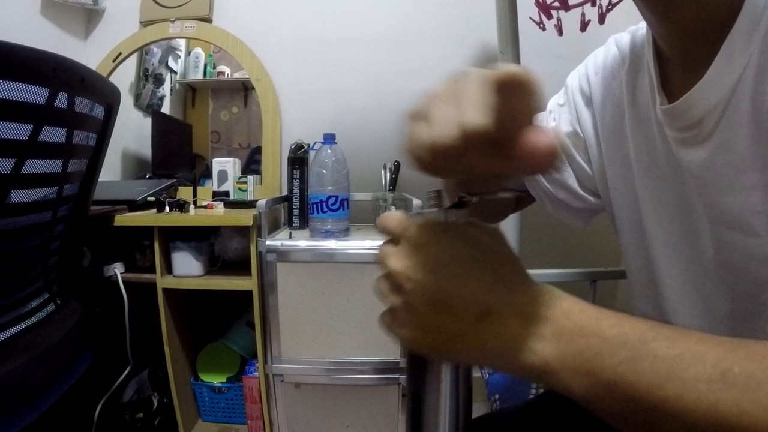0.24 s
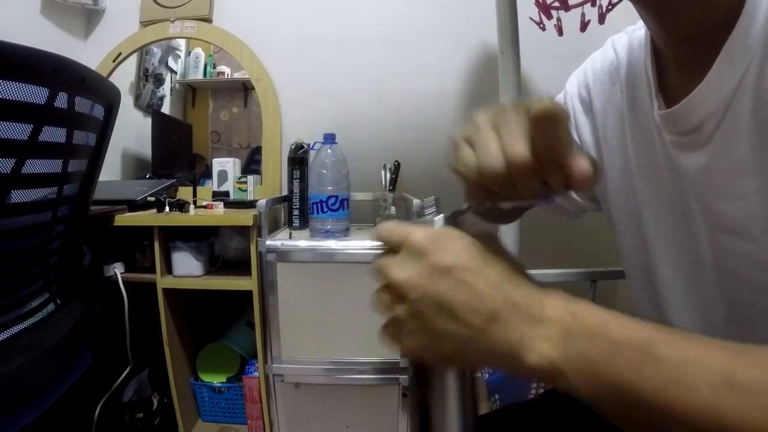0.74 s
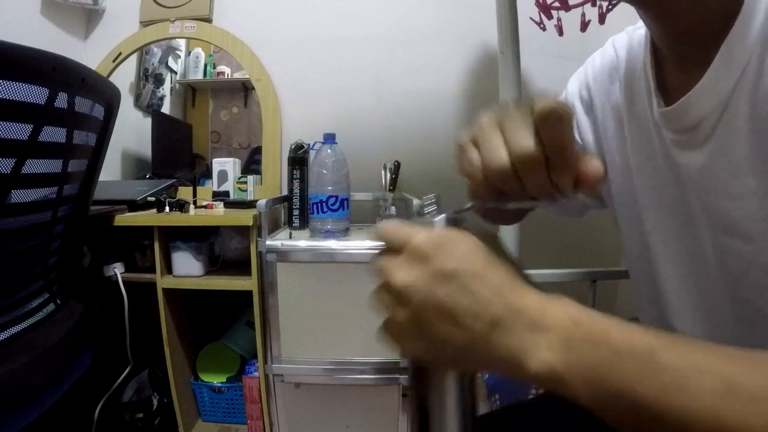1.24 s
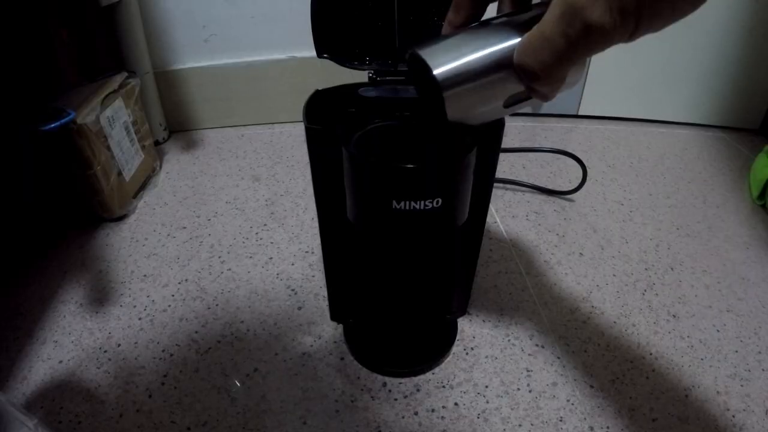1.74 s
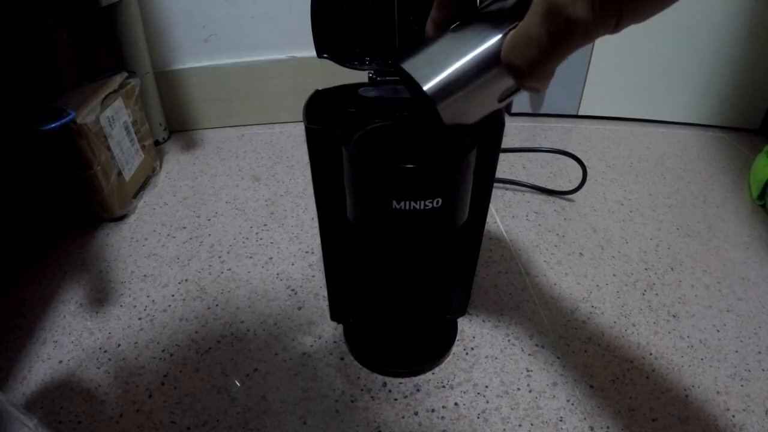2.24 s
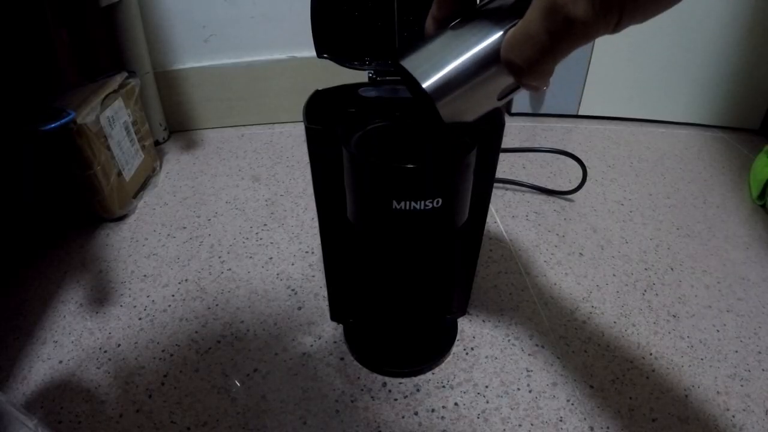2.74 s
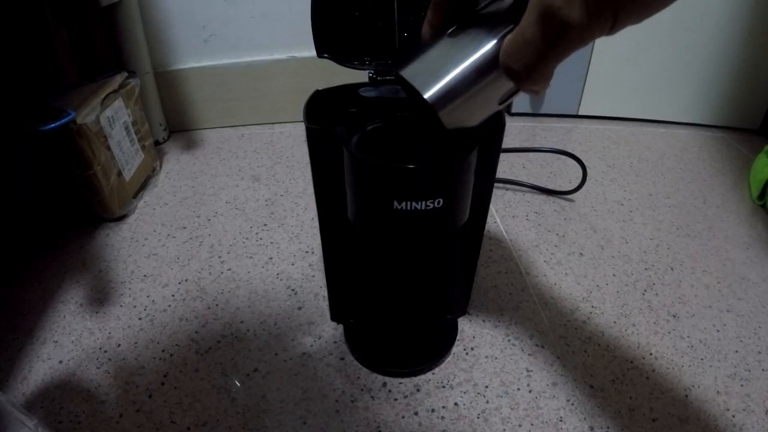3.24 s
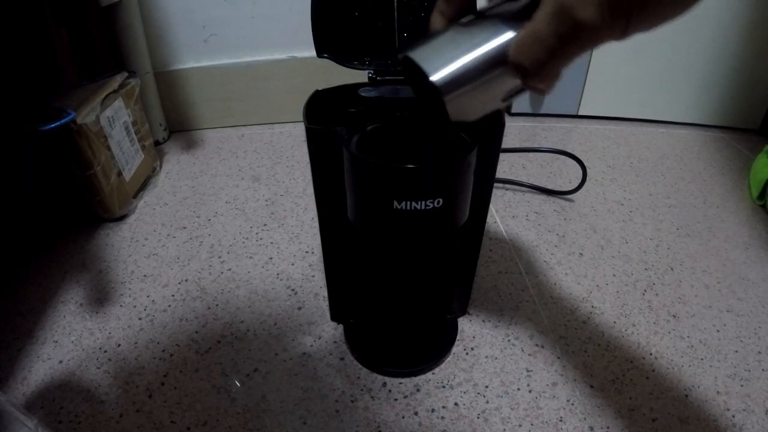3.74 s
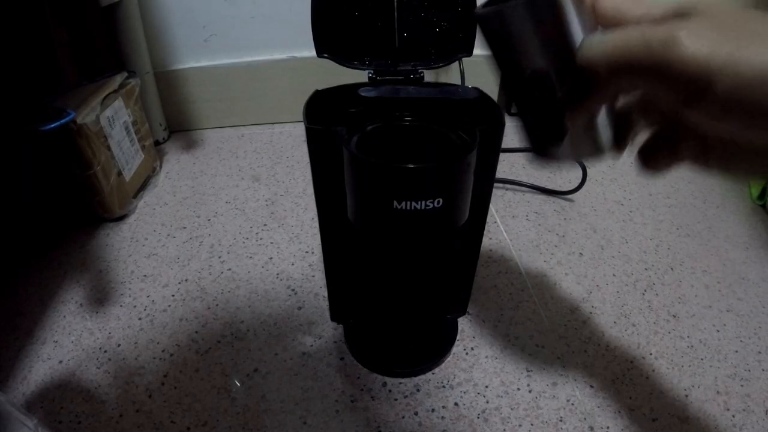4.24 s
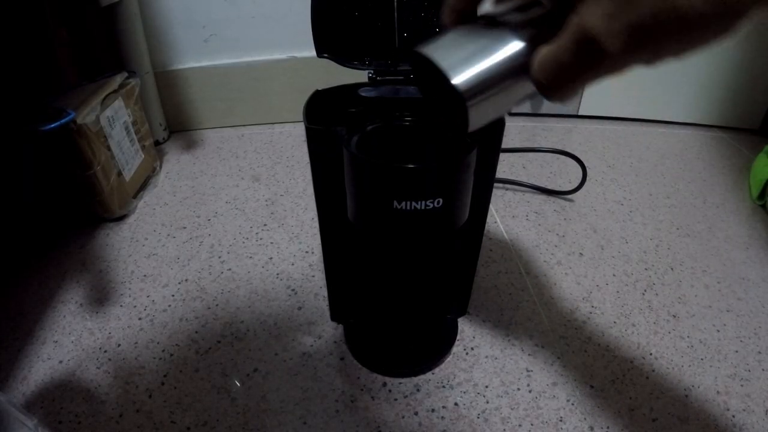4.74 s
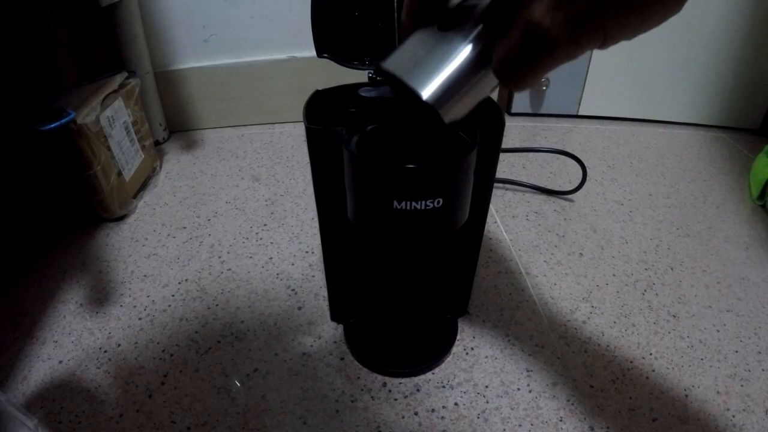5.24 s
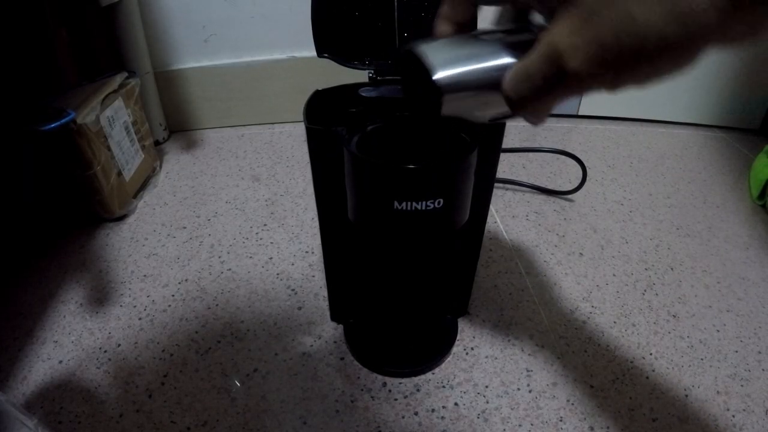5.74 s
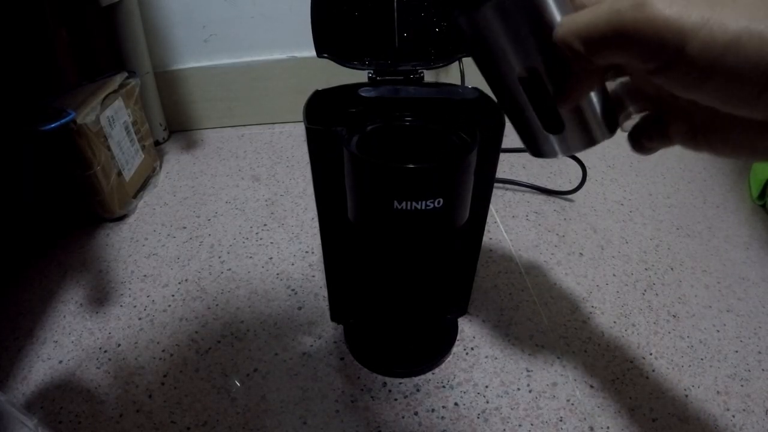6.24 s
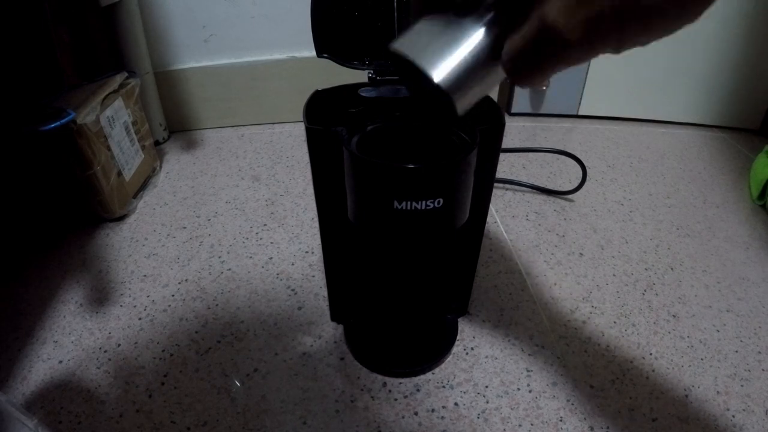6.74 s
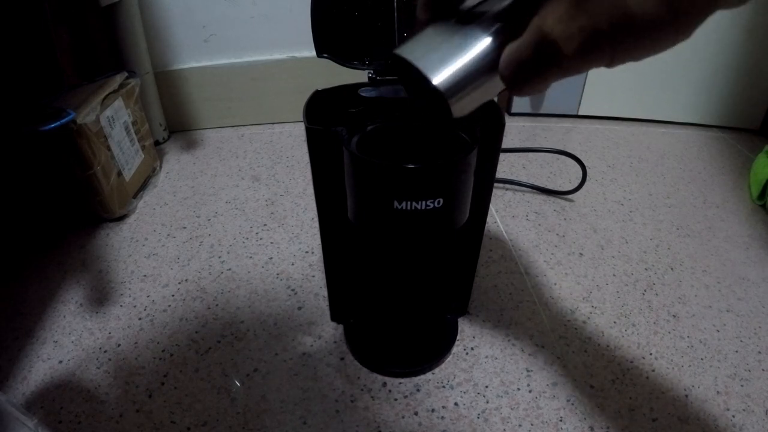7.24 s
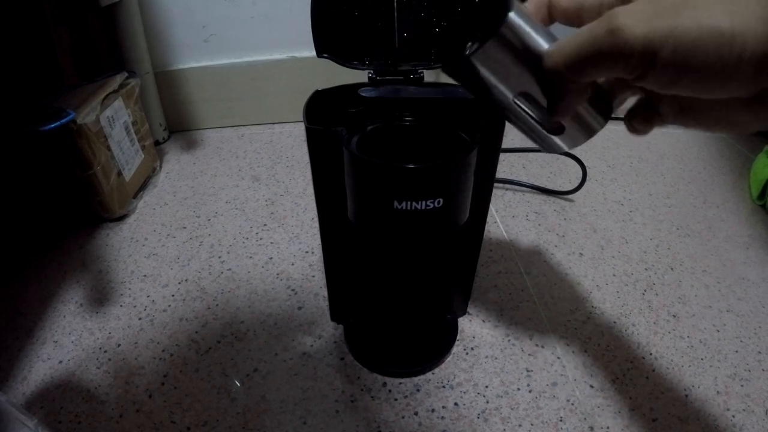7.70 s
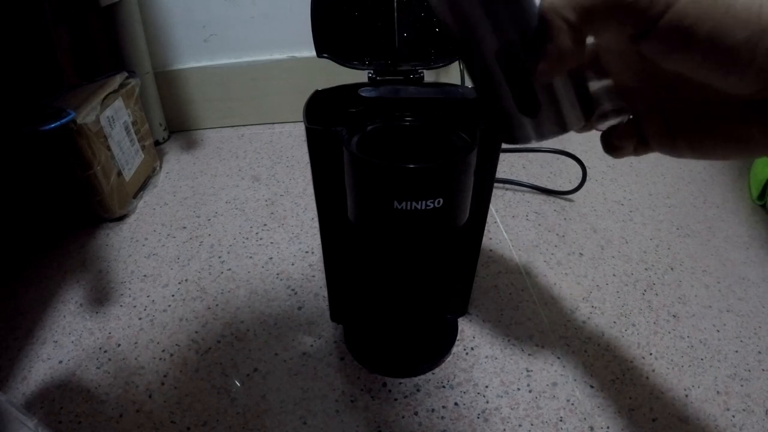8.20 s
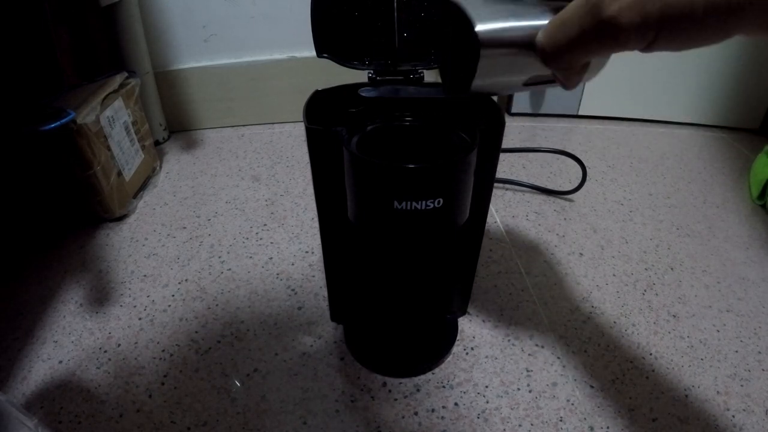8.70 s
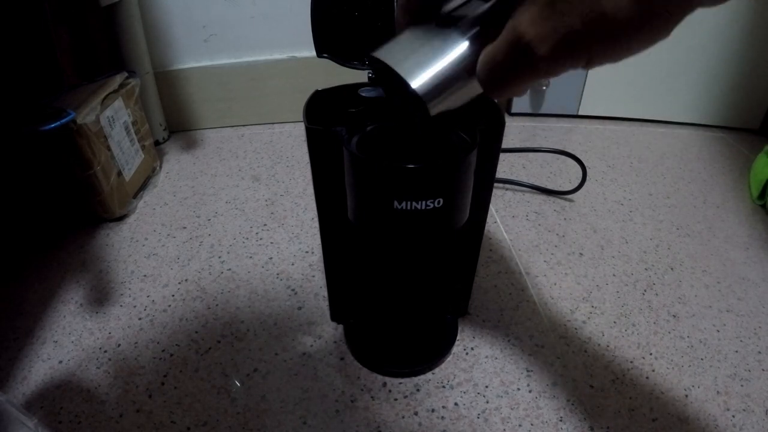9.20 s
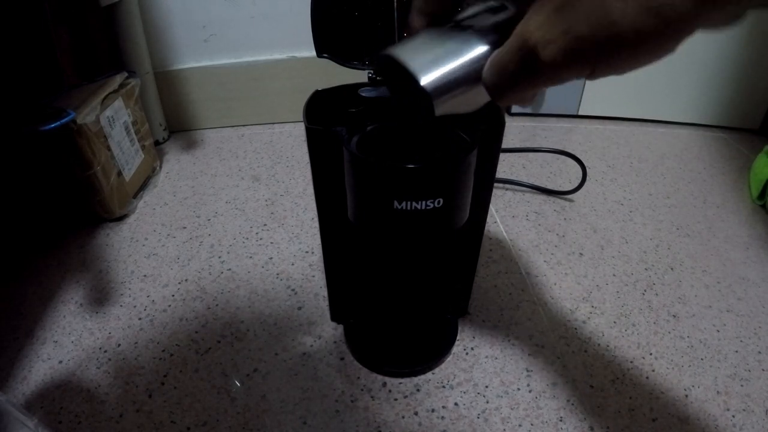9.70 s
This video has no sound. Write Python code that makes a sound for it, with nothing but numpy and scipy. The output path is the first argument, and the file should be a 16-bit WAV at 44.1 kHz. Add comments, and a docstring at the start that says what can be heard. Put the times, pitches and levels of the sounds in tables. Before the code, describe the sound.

Close up in a small room, a hand-cranked steel grinder crunches coffee beans with gritty scraping, sharp cracks and thin metallic ticks. After about a second and a half it cuts hard to a quieter moment: a steel cup taps a plastic coffee machine several times with short, hollow knocks, then shifts with barely audible chinks and soft thuds. Faint hum, low rumble, hiss and regular tiny electrical ticks run underneath.

```python
"""Coffee grinder, then a tapped steel cup

A hand-cranked steel grinder crunches beans: noise splinters and short rings drive burr and barrel filters. The
sound then cuts to a later moment: the steel cup taps a plastic machine, as decaying modes and noise, and chinks
as it shifts in the hand; these chinks and soft thuds through the floor are swells of narrow noise. Low tones
and coloured noise make the faint hum, rumble and hiss; a camera's wireless beacon ticks in the microphone
circuit as damped rings."""
import sys
import numpy as np
from scipy import signal
from scipy.fft import rfft, irfft, next_fast_len
from scipy.io import wavfile
from scipy.ndimage import map_coordinates

SR = 44100
rng = np.random.default_rng(int(sys.argv[2]) if len(sys.argv) > 2 else 0)


def digitize_waveform(pressure):
    """Quantize a signal to 16-bit integers and store it at the path in sys.argv[1].

    Rows of a 2-D input are taken as channels; values are limited to [-1, 1].
    """
    field = np.atleast_2d(pressure).T
    bounded = np.clip(field, -1, 1)
    quanta = np.round(bounded * 32767).astype(np.int16)
    wavfile.write(sys.argv[1], SR, quanta)


N = 439223

# Crank effort: (time [s], crunch level [dB], low grind relative to the crunch [dB])
CRANK = [(0, -61.5, -17), (.13, -58.5, -8), (.18, -53.5, -8), (.25, -51, -6.5), (.47, -52, -4.5),
         (.575, -47, -3), (.65, -52.5, -6), (.77, -49, -1.5), (1.0, -51, -2), (1.26, -50.5, -10),
         (1.42, -51.5, -4.5), (1.482, -60, -8), (1.53, -49, -7)]
# Cracking beans and crank knocks: (time [s], strength [dB], ring pitch [Hz], low part relative to it [dB])
CRACKS = [(0.0474, -40, 3100, -14), (0.0867, -25.5, 2540, -21), (0.1184, -41, 1540, -12),
          (0.149, -35, 2980, -25), (0.177, -32, 3100, -25), (0.2443, -32, 3030, -7.5),
          (0.2857, -32, 3090, -23), (0.456, -31, 1470, -28), (0.4855, -25.5, 3000, -20),
          (0.5164, -27, 1550, -8), (0.5937, -25, 3080, -18), (0.6776, -32.5, 1650, -25),
          (0.7265, -33, 1710, -14), (0.9133, -30, 1570, -19), (0.9995, -35, 1530, -19),
          (1.0753, -28, 2890, -11), (1.128, -40, 1600, -26), (1.141, -29, 3070, -23),
          (1.1904, -29, 1530, -15), (1.2321, -39, 1600, -23), (1.293, -26.5, 2700, -16),
          (1.35, -28, 3140, -17), (1.3857, -26, 1320, -19), (1.3963, -25, 1710, -11),
          (1.4441, -28, 2290, -24), (1.4705, -32, 1550, -11), (1.4976, -20.5, 1640, -15),
          (1.512, -12.5, 1550, -21)]
# Thin ticks of steel on steel: (time [s], strength [dB], pitch [Hz])
TICKS = [(0.1481, -58, 7030), (0.388, -50, 7730), (0.4898, -52, 7510), (0.5172, -49, 7240),
         (0.552, -45, 7240), (0.5935, -49, 14700), (0.8674, -50, 10300), (0.97, -49, 8470),
         (1.0005, -42, 7090), (1.1278, -56, 7830), (1.1422, -43.5, 10700), (1.497, -45, 13700)]
# Colour of the crunch: (frequency [Hz], density [dB per Hz])
BURRS = [(530, -19.5), (900, -4.5), (1670, 4), (2270, -3), (3020, -1), (3320, -7), (4010, -4), (7000, -36),
         (9100, -78), (15400, -120)]
# Colour of the low grind: (frequency [Hz], density [dB per Hz])
GRIND = [(150, -38.5), (250, -12), (280, -15), (618, -1.5), (1200, -2.5), (1560, -44), (2640, -120)]
# Colour of the bright scrape: (frequency [Hz], density [dB per Hz])
SCRAPE = [(3240, -16), (5500, -0.5), (8870, -9.5), (12900, -14.5), (14700, -9), (15600, -14), (16000, -33)]
# Resonances of the steel barrel: (frequency [Hz], width [Hz], lift [dB])
BARREL = [(1650, 220, -0.5), (2560, 50, 4), (3120, 71, 9), (4150, 120, 0.5), (4830, 75, 7),
          (5950, 220, 6.5)]
# Cup against the machine: (time [s], strength [dB], thump relative to it [dB], dull knock relative to it [dB],
# flight to the bounce [s], loss in the bounce [dB])
TAPS = [(2.081, -40, -10, -10, .037, 30), (2.242, -53, -14, -14, .03, 30),
        (2.2638, -32.5, -13, -19.5, .037, 21), (2.4899, -24, -20.5, -22, 0.028, 22),
        (2.9514, -20, -21.5, -23.5, 0.033, 18), (3.174, -23, -16, -16.5, .0349, 16.5),
        (5.6738, -28.5, -12, -12, 0.018, 18), (5.7144, -33, -12.5, -14, .0366, 7.5)]
# Modes of the plastic housing: (frequency [Hz], relative level [dB], t60 [s])
SHELL = [(1145, 3, 0.07), (1330, 7, 0.023), (1505, 5, 0.04), (1735, -22, 0.045), (2280, -20, 0.028),
         (2520, -5.5, 0.026), (2855, -6, 0.032), (3510, -7, 0.027), (4170, -15, 0.021)]
# Modes of its side panel: (frequency [Hz], relative level [dB], t60 [s])
PANEL = [(508, 6.5, 0.043), (590, 7.5, 0.052), (779, 9.5, 0.036), (854, 0.5, 0.036)]
# Modes of its low cavity: (frequency [Hz], relative level [dB], t60 [s])
HOLLOW = [(163, -1.5, 0.11), (259, 6.5, 0.048), (374.5, 3.5, .05)]
# Colour of its many weak modes: (frequency [Hz], density [dB per Hz])
CLACK = [(300, -41), (700, -9.5), (1300, 2.5), (1900, -8), (2600, -5), (5000, -52.5)]
# Colour of the first contact: (frequency [Hz], density [dB per Hz])
SNAP = [(1060, -24), (1800, -23.5), (3010, -5), (5810, -21), (6460, -26.5), (9050, -29.5), (15000, -46)]
# Faint chinks of the cup as it turns: (time [s], strength [dB], pitch [Hz])
CHINKS = [(3.553, -68, 3800), (3.887, -60, 2500), (3.899, -55.5, 2950), (3.924, -52, 2840),
          (3.949, -62, 2650), (4.18, -69, 2810), (4.594, -66, 2680), (5.77, -64, 2750), (5.901, -69, 2700),
          (5.998, -61.5, 2820), (6.31, -72, 2830), (6.334, -65, 2640), (6.423, -58, 2700),
          (6.448, -62.5, 3050), (6.487, -65, 2750), (7.41, -71, 2740), (7.5, -71, 2790), (8.387, -70, 2680),
          (8.53, -68, 2900), (9.82, -67, 2820)]
# Soft thuds and a rustle through the floor:
# (time [s], strength [dB], pitch [Hz], length [s], width [share of pitch])
THUDS = [(8.69, -48, 68, 0.084, 0.22), (8.705, -50.5, 146, 0.055, .25), (9.11, -45.5, 66, 0.11, 0.31),
         (11, -50, 163, 0.08, 0.2), (9.1, -66.5, 1100, .07, 1)]
# Slow air: (time [s], level [dB])
SWAY = [(0.0, -74), (0.08, -54), (3.05, -62.5), (5.52, -50), (6.55, -62.5), (8.07, -46), (8.71, -55),
        (9.04, -40), (9.96, -56)]
# Steady tones: (frequency [Hz], level before the cut [dB], level after it [dB], depth of waver [dB])
HUM = [(100.15, -60.5, -58, 1.1), (73.2, -76, -65, 2.5), (18.2, -57, -62, 1.5), (27.3, -65.5, -68.5, -8),
       (61.3, -80, -71, 7), (49.5, -68, -67.5, 4)]
# Colour of the rumble: (frequency [Hz], density [dB per Hz])
RUMBLE = [(8.2, -42), (14, -4), (53, -3.8), (104, -5), (147, -14), (270, -15.5), (420, -25), (550, -67),
          (920, -120)]
# Mean rumble level: (before the cut [dB], after it [dB])
RUMBLE_DB = (-64.5, -62)
# Colour of the hiss: (frequency [Hz], density [dB per Hz])
HISS = [(250, -7), (450, 3.5), (590, 4), (655, 11), (730, 3.5), (900, 1), (1200, -1), (2100, -2.5),
        (5000, -7.5), (10000, -10.5), (15000, -11.5), (15400, -30)]
# Mean beacon strength: (before the cut [dB], after it [dB])
BEACON_DB = (-50, -47)
# Dying away of the room: (frequency [Hz], t60 [s])
ROOM = [(200, 0.2), (1500, 0.14), (5000, 0.15), (12000, 0.16)]

CUT_S = 1.526  # the grinder stops here and the later moment starts
TOP_HZ = 16400  # nothing is kept from here up

# Grinder
SPLIT_HZ = 2300  # between lower and upper crunch
UPPER_DB, BRIGHT_DB = 2, -19  # upper crunch, and scrape at full effort, over the crunch
FULL_DB, EASES = -50, 0.55  # crunch at full effort; share of a drop in effort that the scrape ignores
TURN_S, PUSH_S, PUSH_DB = 0.505, 0.43, 2  # one turn of the crank, moment of a push, brightening it gives
CRACK_BLOW_T60_S, CRACK_RING_T60_S = 0.0206, 0.02
UPPER_LAGS = 0.3  # upper part of a crack falls behind in harder cracks [dB per dB]
CRACK_BRIGHT_DB = -32.5  # scrape that a crack sets off, over its strength

# Beacon
BEACON_S, BURST_S = .1024, .00212  # period, time on air
FIRST_S = (.0925, 1.58366)  # first burst before and after the cut
STRAY_S = 2.8465  # one more burst, out of step

# Cup
SNAP_DB, SNAP_FADES = -14.5, .8  # first contact over the blow; share of a bounce's loss it loses on top
DAMPED_S = (.1, 0.043)  # t60 of the hand's damping (blow, bounce)
THUMP_KEEPS, KNOCK_KEEPS = 0.17, 1  # share of a bounce's loss that cavity and panel escape
KNOCK_TOP_DB = -3  # loudest knock over a contact
CHINK_S, CHINK_WIDTH = 0.011, 0.16  # length; width as share of pitch

T = np.arange(N) / SR
AFTER = T >= CUT_S


def amp(db):
    """Gain of a level in dB."""
    return 10 ** (np.asarray(db) / 20)


def unit(x):
    """x at rms 1."""
    return x / np.sqrt(np.mean(x ** 2) + 1e-20)


def along(points, hz):
    """Reads (Hz, value) points on a log frequency axis."""
    f, v = np.transpose(points)
    return np.interp(np.log(hz + 1), np.log(f + 1), v)


def curves(rows):
    """One value per sample for each column after the time."""
    s, *cols = np.transpose(rows)
    return [np.interp(T, s, c) for c in cols]


def wobble(rate):
    """A smooth random curve with rate knots a second."""
    knots = rng.standard_normal(int(N * rate / SR) + 4)
    return map_coordinates(knots, [T * rate])


def coloured(x, db_of):
    """x through the causal minimum-phase filter of energy 1 whose colour is db_of(Hz)."""
    size = 2 ** 15
    level = amp(db_of(np.fft.rfftfreq(size, 1 / SR)))
    cepstrum = irfft(np.log(level + 1e-6), size)
    # folding the cepstrum forward in time makes the filter causal
    cepstrum[1:size // 2] *= 2
    cepstrum[size // 2 + 1:] = 0
    kernel = irfft(np.exp(rfft(cepstrum)), size)
    return signal.fftconvolve(x, kernel / np.linalg.norm(kernel))[:len(x)]


def add(track, s, sound):
    """Lays a sound into a track at s seconds."""
    part = track[..., round(s * SR):][..., :sound.shape[-1]]
    part += sound[..., :part.shape[-1]]


def ring(modes, t, scatter_db):
    """Decaying sine modes, each struck at a slightly random strength."""
    out = 0
    for hz, db, t60 in modes:
        strike_db = db + rng.normal(0, scatter_db)
        out = out + amp(strike_db - 60 * t / t60) * np.sin(2 * np.pi * hz * t)
    return out


def room(x, wet_db):
    """The dry sound with a short, late tail in which each frequency dies at its own speed."""
    hz, t, z = signal.stft(rng.standard_normal(SR // 3), SR, nperseg=256)
    decay = amp(-60 * t / along(ROOM, hz)[:, None])
    tail = signal.istft(z * decay, SR, nperseg=256)[1]
    late = np.pad(x, (130, 0))
    return x + amp(wet_db) * signal.fftconvolve(late, tail / np.linalg.norm(tail))[:len(x)]


def background():
    """Mains hum and other low tones waver over noise coloured as rumble, slow air and hiss."""
    def noise(points):
        return unit(coloured(rng.standard_normal(N), lambda f: along(points, f)))

    hum = np.zeros(N)
    for hz, before, after, waver in HUM:
        level_db = np.where(AFTER, after, before) + waver * wobble(2.7)
        hum += amp(level_db) * np.sqrt(2) * np.sin(2 * np.pi * (hz * T + rng.random()))
    before, after = RUMBLE_DB
    rumble = amp(np.where(AFTER, after, before) + 1.5 * wobble(2.92)) * noise(RUMBLE)
    sway = amp(curves(SWAY)[0]) * noise([(1, -23.0), (4, 1.5), (9, -8.5), (16, -23), (40, -84)])
    hiss = amp(-68.5 + 0.56 * wobble(6)) * noise([*HISS, (16500, -60)])
    return hum + rumble + sway + hiss


def grit(rate, spread_db, smooth):
    """Splinters at random moments, a few much larger than the rest, on a share of smooth friction."""
    moments = rng.random(N) < rate / SR
    sizes = amp(spread_db * np.minimum(rng.exponential(size=N), 3.5))
    hits = moments * sizes * rng.standard_normal(N)
    share = np.clip(smooth, 0, 1)
    return np.sqrt(1 - share) * unit(hits) + np.sqrt(share) * rng.standard_normal(N)


def chips(rate, centre_hz, cycles, spread_db):
    """Bean chips, each a short ring at a pitch of its own."""
    rows = rng.random((round(rate * CUT_S), 3))
    moment, pitch, size = rows[:, :1], rows[:, 1:2], rows[:, 2:]
    hz = centre_hz * np.exp(1.48 * (pitch - .5))
    t = np.arange(300) / SR
    strength = amp(-spread_db * np.log(size + .02))
    rings = strength * np.exp(-t * hz / cycles) * np.sin(2 * np.pi * hz * t)
    at = (moment * CUT_S * SR).astype(int) + np.arange(300)
    out = np.bincount(at.ravel(), rings.ravel(), N)
    return out / np.std(out[~AFTER])


def crank_force(crunch_db, low_db):
    """Friction and splinters under the crank: lower crunch, upper crunch, low grind, bright scrape."""
    bright_db = BRIGHT_DB + EASES * (FULL_DB - crunch_db)
    push_db = PUSH_DB * np.cos(2 * np.pi * (T - PUSH_S) / TURN_S)
    clumps = wobble(44.95)  # splinters come in clumps
    splinters = grit(1800, spread_db=2.0, smooth=0.34)
    lower = amp(crunch_db - 0.5 + 0.65 * clumps + 1.1 * wobble(25.0)) * splinters
    upper = amp(crunch_db + UPPER_DB + push_db + 1.44 * clumps + 0.96 * wobble(24.94)) * splinters
    grind_db = crunch_db + low_db + 1.8 * clumps + 4.0 * wobble(24.8)
    grind = amp(grind_db) * grit(900, spread_db=3.5, smooth=0.39)
    scrape_db = crunch_db + bright_db + push_db + 2.2 * clumps
    scrape = amp(scrape_db) * grit(2500, spread_db=1.0, smooth=0.41)
    return np.array([lower, upper, grind, scrape])


def add_cracks(force, rings):
    """Each bean shell gives way with a sharp blow and a fading burst on all four forces, and rings."""
    t = np.arange(2000) / SR
    for s, db, hz, low in CRACKS:
        split = rng.standard_normal((4, len(t))) * amp(-60 * t / CRACK_BLOW_T60_S)
        split[:, 0] += 3.5  # the one sharp blow
        upper = -14.5 - UPPER_LAGS * (db + 27.5)
        parts_db = np.array([[-12.], [upper], [low - 3.], [CRACK_BRIGHT_DB]])
        add(force, s, split * amp(db + parts_db))
        tone = ring([(hz, 0, CRACK_RING_T60_S)], t, scatter_db=2.0)
        add(rings, s, amp(db - 7.5) * tone * (1 - np.exp(-t / 0.00042)))


def add_ticks(force, rings):
    """Steel on steel rings at three close pitches and sets off a puff of scrape."""
    t = np.arange(2000) / SR
    for s, db, hz in TICKS:
        modes = [(hz, 0, .006), (0.9 * hz, -4, .004), (1.1 * hz, -5, .004)]
        add(rings, s, amp(db - 2.5) * ring(modes, t, scatter_db=0.0))
        add(force[3], s, amp(db - 7.5 - 60 * t / 0.013) * rng.standard_normal(len(t)))


def barrel(f):
    """Colour of the burrs with the resonant lifts of the steel barrel, in dB."""
    lifts = sum(db / (1 + (2 * (f - hz) / width) ** 2) for hz, width, db in BARREL)
    return along(BURRS, f) + lifts


def grinder():
    """Bean splinters and cracks drive the burrs and the steel barrel."""
    crunch_db, low_db = curves(CRANK)
    force = crank_force(crunch_db, low_db)
    rings = amp(crunch_db - 5.5) * chips(500, centre_hz=1970, cycles=2.4, spread_db=4.0)
    add_cracks(force, rings)
    add_ticks(force, rings)
    colours = (lambda f: barrel(f) - 10 * np.log10(1 + (f / SPLIT_HZ) ** 8),
               lambda f: barrel(f) - 10 * np.log10(1 + (SPLIT_HZ / (f + 1)) ** 8),
               lambda f: along(GRIND, f),
               lambda f: along(SCRAPE, f))
    driven = sum(coloured(x, colour) for x, colour in zip(force, colours))
    return room(driven + rings, wet_db=-11.0) * ~AFTER


def beacon():
    """The radio draws current in a short burst; the supply sags and its regulator rings at both edges."""
    def settle(u):
        turn = 2 * np.pi * 183.5 * u
        return -1 + np.exp(-u / .00093) * (4.04 * np.sin(turn) + .3 * np.cos(turn))

    def step(u):
        spike = 0.32 * np.exp(-np.abs(u) / .0001)  # rides on each edge
        return (u >= 0) * (settle(u - .00004) - spike)

    t = np.arange(SR // 50) / SR
    out = np.zeros(N)
    before = np.arange(FIRST_S[0], CUT_S, BEACON_S)
    after = np.arange(FIRST_S[1], N / SR, BEACON_S)
    for s in np.r_[before, after, STRAY_S]:
        gain = amp(BEACON_DB[int(s >= CUT_S)] + rng.normal(0, 0.96))
        add(out, s, gain * (step(t) - step(t - BURST_S)))
    return out


def contacts():
    """Each tap and its bounce, which is weaker and duller."""
    out = []
    for s, db, thump, knock, flight, loss in TAPS:
        for bounce in range(2):
            lost = bounce * loss
            out.append((s + bounce * flight, db - lost, thump + THUMP_KEEPS * lost,
                        min(knock + KNOCK_KEEPS * lost, KNOCK_TOP_DB),
                        SNAP_DB - SNAP_FADES * lost, DAMPED_S[bounce]))
    return out


def taps():
    """Each contact snaps, then rings the housing, panel and cavity; each gets its own room tail."""
    t = np.arange(SR // 3) / SR

    def swell(rise):
        return 1 - np.exp(-t / rise)

    def burst(t60, rise, points):
        noise = rng.standard_normal(len(t)) * amp(-60 * t / t60) * swell(rise)
        return coloured(noise, lambda f: along(points, f))

    out = np.zeros(N)
    for s, db, thump, knock, snap, damped in contacts():
        shell = ring(SHELL, t, scatter_db=1.0) * swell(0.00087)
        panel = ring(PANEL, t, scatter_db=2.5) * swell(0.0021)
        cavity = ring(HOLLOW, t, scatter_db=3.0) * swell(0.0016)
        body = amp(-9) * shell + amp(knock) * panel
        body += amp(-5.5) * burst(0.046, 0.00047, CLACK)
        body += amp(snap) * burst(0.027, 0.00018, SNAP)
        # the hand damps the body but not the cavity
        contact = body * amp(-60 * t / damped) + amp(thump + 0.6) * cavity
        add(out, s, room(amp(db) * contact, wet_db=-8.5))
    return out


def puffs(table, overtone_db):
    """Soft swells of narrow noise around each pitch, with a weaker band above."""
    lead = .08  # each swell peaks this many seconds into its noise
    out, t = np.zeros(N), np.arange(SR // 4) / SR - lead
    for s, db, hz, length, width in table:
        def band(f):
            main = -12 * np.log2(1 + ((f - hz) / (width * hz)) ** 2)
            overtone = overtone_db - 9 * np.log2(1 + ((f - 1.44 * hz) / (0.39 * hz)) ** 2)
            return np.maximum(main, overtone)

        swell = np.exp(-.5 * (2 * t / length) ** 2)
        add(out, s - lead, amp(db - 2) * swell * coloured(rng.standard_normal(len(t)), band))
    return out


def chinks():
    """The turning cup chinks faintly: very short puffs of narrow noise in the room."""
    rows = [(*row, CHINK_S, CHINK_WIDTH) for row in CHINKS]
    return room(puffs(rows, overtone_db=-12.5), wet_db=-7)


def thuds():
    """Soft thuds and a rustle through the floor: slower puffs of mostly low noise, with no room tail."""
    return puffs(THUDS, overtone_db=-9)


def scene():
    """All sources, one channel."""
    return (background() + grinder() + beacon() + taps() + chinks() + thuds())[None]


def record(dry):
    """The camera keeps nothing above its band limit."""
    size = next_fast_len(N + SR // 2)
    keeps = np.fft.rfftfreq(size, 1 / SR) < TOP_HZ
    return irfft(rfft(dry, size) * keeps, size)[..., :N]


dry = scene()
out = record(dry)
digitize_waveform(out)
```